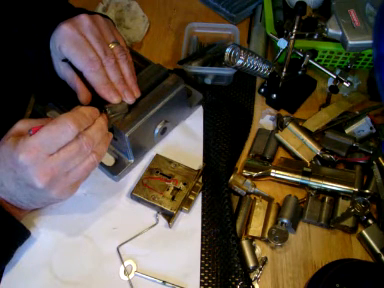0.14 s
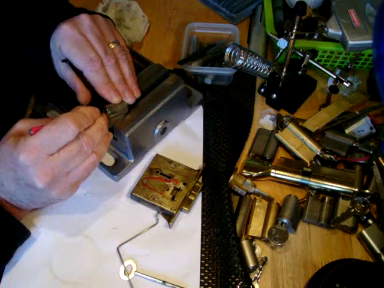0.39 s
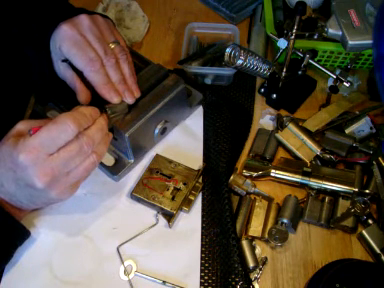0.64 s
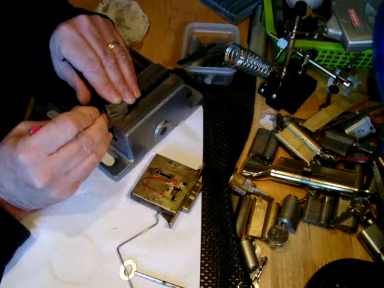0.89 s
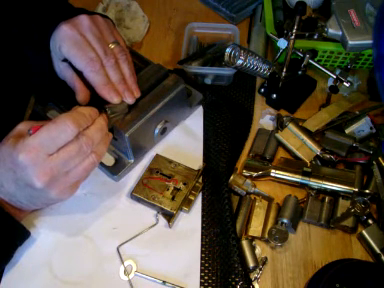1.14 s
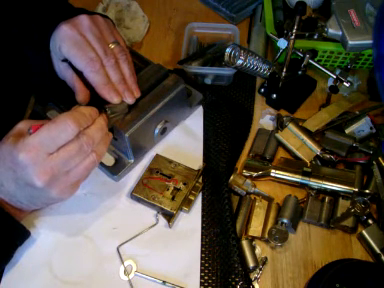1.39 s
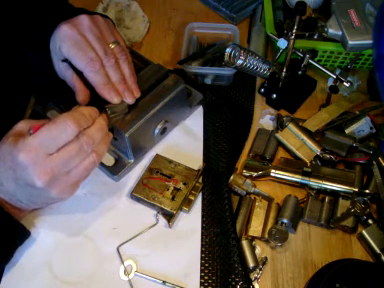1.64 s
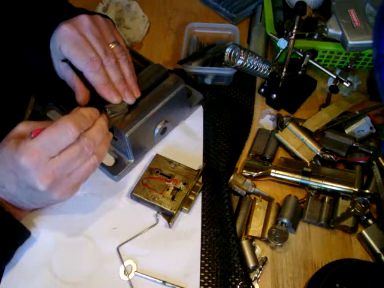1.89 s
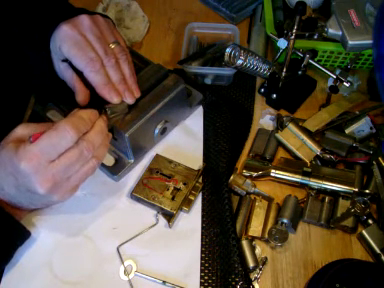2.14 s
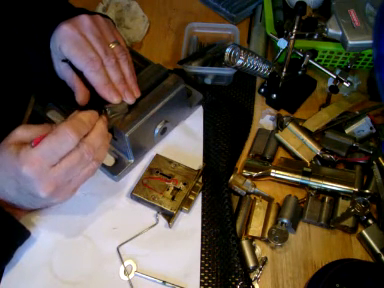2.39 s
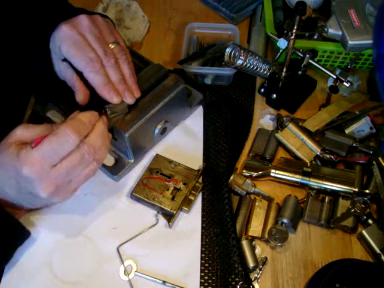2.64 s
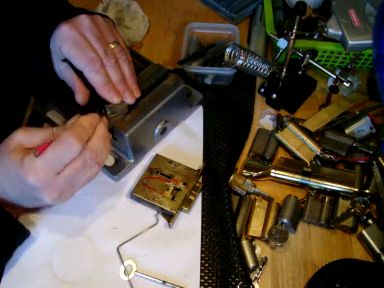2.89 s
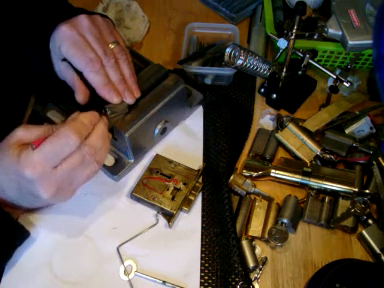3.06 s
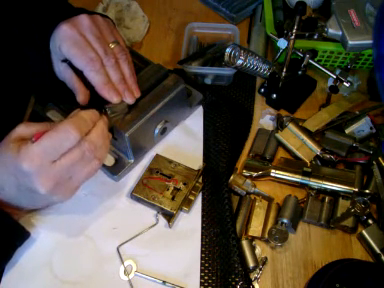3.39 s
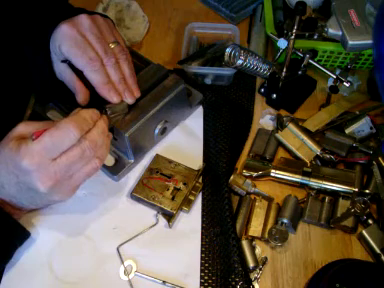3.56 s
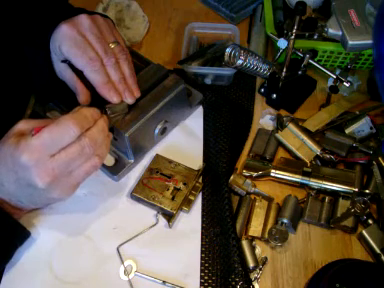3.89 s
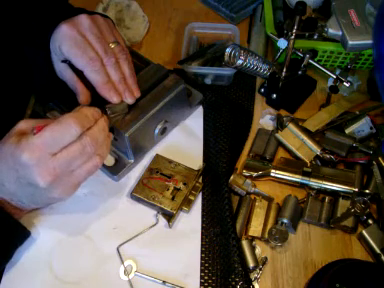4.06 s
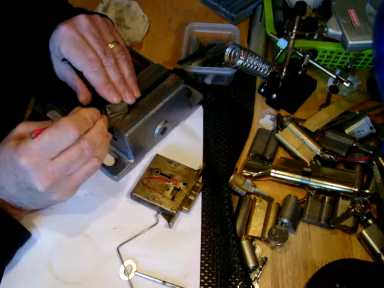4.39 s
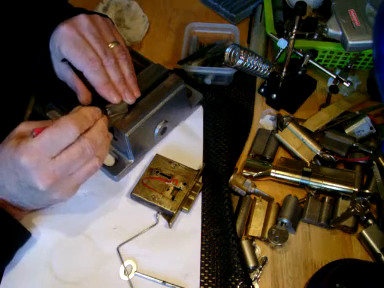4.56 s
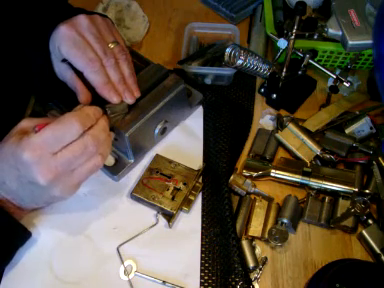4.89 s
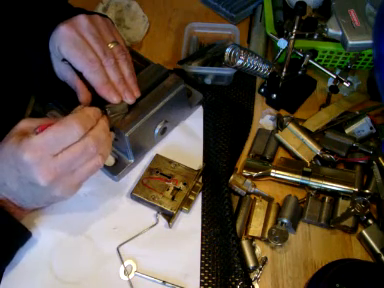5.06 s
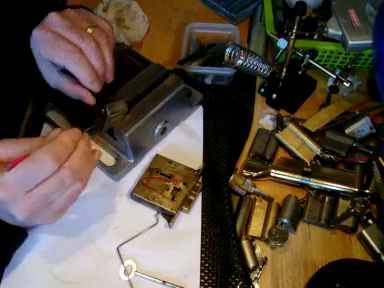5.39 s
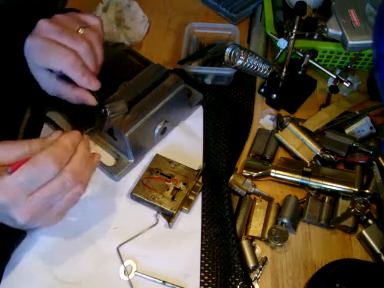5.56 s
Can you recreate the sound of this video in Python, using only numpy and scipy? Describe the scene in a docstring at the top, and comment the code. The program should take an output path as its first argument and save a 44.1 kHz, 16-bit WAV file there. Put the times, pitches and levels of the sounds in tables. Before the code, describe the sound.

Close on a workbench in a small room, a lock held in a vice is picked. Isolated small ringing metal clicks come at uneven gaps, a stronger one after two seconds and a cluster near four, with dull hand bumps on the bench. A brief scrape leads to two bright steel clacks at the end. A cheap microphone adds constant hiss, low hum and a thin, stuttering high whine.

```python
"""A lock clamped in a vice is picked: pins snap back against the pick with small ringing clicks.
Each contact is a rattling force that sets off fading tones in bench, vice, lock body, pick and pins.
Near the end the lock gives with two bright steel clacks; hand bumps are dull thuds of the bench top.
A cheap desk camera in the small room adds hiss (shaped noise), mains and fan hum (wavering sines)
and a thin electronic whine (one sine) that stutters at its frame rate."""
import sys
import numpy as np
from scipy import signal
from scipy.fft import rfft, irfft
from scipy.io import wavfile

SR = 44100
rng = np.random.default_rng(int(sys.argv[2]) if len(sys.argv) > 2 else 0)


def generate_wav(sig):
    """Save sig (samples, or channels by samples) to the path in sys.argv[1] as 16-bit PCM at SR."""
    pcm = np.round(np.clip(np.atleast_2d(sig).T, -1, 1) * 32767).astype(np.int16)
    wavfile.write(sys.argv[1], SR, pcm)


N = 252693  # samples, about 5.7 s
TIME = np.arange(N) / SR  # s
SHORT = TIME[:2 ** 13 + 2 ** 12]  # time within one hit or echo, s

# tones of the bench top: [f/Hz, relative level/dB, time to fade by 60 dB/s]
BENCH = [(88, -4.5, 0.062), (128, 1.5, 0.03), (183, -7.5, 0.075), (275, -6, 0.044), (382, -1, 0.086)]
# tones of the lock body: [f/Hz, relative level/dB, time to fade by 60 dB/s]
LOCK = [(1007, 0, 0.24), (1020, -3, 0.032), (1123, -3, .1), (1150, 4, 0.21), (1365, -2.5, .14),
        (1435, -5, 0.27)]


def from_db(db):
    """Turn decibels into an amplitude factor."""
    return 10 ** (np.asarray(db) / 20)


def rms_one(x):
    """Scale a signal so that its rms is 1."""
    return x / np.sqrt(np.mean(x ** 2) + 1e-20)


def add(track, s, sound):
    """Mix a sound in at time s, cutting it off at the end of the track."""
    at = int(round(s * SR))
    track[at:at + len(sound)] += sound[:N - at]


def noise(gain):
    """Make noise of rms 1: random samples with each frequency bin scaled by its gain."""
    white = rng.standard_normal(2 * len(gain) - 2)
    return rms_one(irfft(rfft(white) * gain)[:N])


def background():
    """Steady rumble and hiss with a few faint resonances, over hum whose phase slowly wanders."""
    # room rumble and amplifier hiss: [f/Hz, relative level per Hz/dB]
    floor = [(20, 18), (40, 14.5), (110, 15.5), (300, 11.5), (700, 8), (1100, 5), (1800, 2), (3500, 0),
             (5000, -1), (8500, -1), (10000, -4.5), (11300, -9), (12500, -20), (13600, -25)]
    floor_db = -47.5  # sets the overall level of the rumble and hiss
    # faint ringing in the hiss: [centre f/Hz, half-width/Hz, rms level/dB]
    hiss_peaks = [(3087, 105, -65), (3850, 110, -68), (6630, 81, -67)]
    # mains and fan hum: [f/Hz, rms level/dB]
    hum = [(49.2, -67), (49.9, -57.5), (99.8, -64), (149.8, -57), (249.7, -62), (296, -61.5),
           (345.5, -58.5), (440, -62.5), (493, -66), (538, -71.5), (790, -66)]

    hz = np.maximum(np.fft.rfftfreq(2 ** 18, 1 / SR), 1)
    points, levels = np.transpose(floor)
    floor_shape = from_db(np.interp(np.log(hz), np.log(points), levels))
    power = (from_db(floor_db) * rms_one(floor_shape)) ** 2
    for centre, width, db in hiss_peaks:
        peak = 1 / (1 + ((hz - centre) / width) ** 2)
        power += (from_db(db) * rms_one(peak)) ** 2
    out = np.sqrt(power.mean()) * noise(np.sqrt(power))

    knots = TIME[::2 ** 11]
    for pitch, db in hum:
        drift = 0.039 * np.cumsum(rng.standard_normal(len(knots)))  # random walk of the phase, rad
        wander = np.interp(TIME, knots, drift) + rng.uniform(0, 2 * np.pi)
        out += from_db(db) * np.sqrt(2) * np.sin(2 * np.pi * pitch * TIME + wander)
    return out


def whine():
    """A sine whose pitch sags very briefly at most frames, so that it loses part of a cycle."""
    # the stutter goes round and round in seven steps: [cycles lost at each frame]
    slip_round = [.2, .4, .6, .8, 0, .2, .6]
    whine_hz, whine_db, sag_hz = 7703.9, -46.5, 553  # pitch, rms level, drop in pitch
    first_frame_s, frame_s = .0195, .034597
    round_start_s, slip_step_s = .07, .258

    frames = np.arange(first_frame_s, N / SR, frame_s)
    steps = np.floor((frames - round_start_s) / slip_step_s).astype(int)
    sag = np.zeros(N)
    for s, cycles in zip(frames, np.take(slip_round, steps, mode="wrap")):
        length = cycles / sag_hz
        add(sag, s - length / 2, np.full(int(round(length * SR)), float(sag_hz)))
    phase = 2 * np.pi * np.cumsum(whine_hz - sag) / SR
    return from_db(whine_db) * np.sqrt(2) * np.sin(phase)


def chatter(length):
    """The force of a contact: a first knock, then a dying rattle of tiny rebounds."""
    rebounds = rng.standard_normal(len(SHORT)) * (rng.random(len(SHORT)) < .1)
    force = rebounds * np.exp(-SHORT / length)
    force /= np.sqrt(np.sum(force ** 2)) + 1e-9
    force[0] += 1
    return force


def surroundings(early_db, early_s):
    """Direct sound, quick echoes off the cluttered bench, then the tail of the room."""
    room_t60_s, room_db = 0.31, -2  # time to fade by 60 dB; tail energy against the direct sound
    early, late = rng.standard_normal((2, len(SHORT)))
    early = early * (SHORT > .002) * np.exp(-SHORT / early_s)
    late = late * (1 - np.exp(-SHORT / 0.022)) * from_db(-60 * SHORT / room_t60_s)
    echoes = from_db(early_db) * rms_one(early) + from_db(room_db) * rms_one(late)
    response = echoes / np.sqrt(len(SHORT))
    response[0] += 1
    return response


def unit_attack(x):
    """Scale each hit so that its first 15 ms have rms 1."""
    attack = x[..., :int(.015 * SR)]
    return x / np.sqrt(np.mean(attack ** 2, axis=-1, keepdims=True) + 1e-20)


def strike(modes, forces, rooms, scatter_db, crack_db, crack_s, tilt_db=0):
    """One hit per force: each mode (tone) rings cleanly and gives a short crack smeared by echoes."""
    hz, db, t60 = np.transpose(modes)
    db = db + np.outer(tilt_db, np.log2(hz / hz[0]))  # tilt in dB per octave above the first mode
    swing = np.sin(2 * np.pi * np.outer(hz, SHORT))
    rings = rfft(swing * np.exp(-np.log(1000) * SHORT / t60[:, None]))
    cracks = rfft(swing * SHORT * np.exp(-SHORT / crack_s))
    force = rfft(forces)
    echoed_force = force * rfft(rooms)

    out = 0
    for shapes, drive, gain_db in (rings, force, db), (cracks, echoed_force, db + crack_db):
        # what each mode takes from each force; dividing by it lets the gains set the levels
        taken_up = np.sqrt(np.abs(drive) ** 2 @ np.abs(shapes.T) ** 2)
        scattered_db = gain_db + scatter_db * rng.standard_normal(taken_up.shape)
        strength = from_db(scattered_db) / taken_up
        signs = rng.choice([-1, 1], taken_up.shape)
        out = out + drive * ((strength * signs) @ shapes)
    # a part radiates little outside the range of its modes
    radiated = signal.butter(2, [.7 * hz[0], 1.2 * hz[-1]], "band", fs=SR, output="sos")
    return unit_attack(signal.sosfilt(radiated, irfft(out)))


def share(modes, hardness):
    """Extra level in dB: hard contacts favour parts that ring above the lock body, soft ones below."""
    part, body = (np.log2(np.array(table)[:, 0]).mean() for table in (modes, LOCK))
    return hardness * (part - body)


def picking():
    """Every click and drag catch shakes the bench, the vice, the lock body, the pick and the pins."""
    # pins snap back and the plug gives:
    # [t/s, level/dB, hardness/dB per octave, extra ring of the pick/dB, chatter decay time/s]
    clicks = [(0.283, -51, -1.5, 6, 0.0052), (1.151, -39, -3, 1.5, 0.0022), (1.4515, -54, -4, 0, 0.0053),
              (2.2599, -33.5, 1, -1, 0.0025), (3.7383, -42.5, -2.5, -9, 0.0014),
              (3.97, -44.5, -4.5, 1, 0.0084), (3.989, -35, -1, 5, 0.0019), (4.041, -50.5, -1, 12, .003),
              (4.229, -42, -2, 2.5, 0.0059), (4.861, -44.5, -1, -6, 0.0028), (5.2476, -44, 2, -10, .003),
              (5.4893, -31.5, 3, 9.5, 0.0024), (5.4924, -38.5, 8, 1.5, 0.0016), (5.4983, -37, 2.5, 9, .003),
              (5.5265, -48.5, -1.5, 23, 0.0034), (5.557, -31.5, 3.5, -3.5, 0.0061)]
    # tones of the vice: [f/Hz, relative level/dB, time to fade by 60 dB/s]
    vice = [(426, -10, .06), (488, -9, 0.038), (585, -4, 0.41), (615.5, -3.5, 0.15), (704, -0.5, 0.18),
            (809, 0, 0.099)]
    # tones of the steel pick: [f/Hz, relative level/dB, time to fade by 60 dB/s]
    pick = [(2008, -8, 0.15), (2375, -1, 0.087), (2300, 0.5, 0.096), (2520, -2.5, 0.13), (2680, -5, 0.03),
            (2887, -2.5, 0.15), (3190, -5, 0.035), (3340, -1, 0.16), (3570, -13, .06), (3950, -11, .06),
            (4106, -3, 0.1), (4340, -7, 0.066)]
    # tones of the pins: [f/Hz, relative level/dB, time to fade by 60 dB/s]
    pins = [(4690, -5.5, 0.069), (5420, -0.5, 0.037), (5400, 7.5, 0.096), (5540, -6, .04), (5850, -1, 0.13),
            (6220, 4.5, 0.055), (6320, 1, 0.054), (6820, 2, 0.027), (6930, -9, .05), (7856, -1.5, 0.025),
            (8390, -18, .04), (9300, -11, .03), (10560, -20, 0.0092), (11800, -25, .008)]
    # level of each part at hardness 0 and no extra ring, against the lock body
    bench_db, vice_db, pick_db, pins_db = -18, -2.5, -7.5, -9

    times, db, hardness, pick_ring_db, lengths = np.transpose(clicks + catches())
    # dB per octave: hardness brightens the pick, but a flicked pick rings mostly in its lowest modes
    pick_tilt = 2 + 1.0 * hardness - 0.68 * pick_ring_db
    forces = np.array([chatter(length) for length in lengths])
    rooms = np.array([surroundings(early_db=4.0, early_s=0.015) for s in times])

    bench_hits = strike(BENCH, forces, rooms, scatter_db=4.0, crack_db=5.0, crack_s=0.0019, tilt_db=9.0)
    vice_hits = strike(vice, forces, rooms, scatter_db=2.0, crack_db=-2.0, crack_s=0.0011)
    lock_hits = strike(LOCK, forces, rooms, scatter_db=-1.5, crack_db=-0.5, crack_s=0.0012)
    pick_hits = strike(pick, forces, rooms, scatter_db=2.5, crack_db=3.0, crack_s=0.00051,
                       tilt_db=pick_tilt)
    pin_hits = strike(pins, forces, rooms, scatter_db=1.5, crack_db=0.0, crack_s=0.00036)
    parts = [(bench_db, bench_hits),
             (vice_db + share(vice, hardness), vice_hits),
             (0, lock_hits),
             (pick_db + share(pick, hardness) + pick_ring_db, pick_hits),
             (pins_db + share(pins, hardness), pin_hits)]
    hits = sum(from_db(db + part_db)[:, None] * sound for part_db, sound in parts)

    out = np.zeros(N)
    for s, hit in zip(times, hits):
        add(out, s, hit)
    return out


def bumps():
    """The hand bumps the vice: soft pushes reach the bench top as dull thuds."""
    # pushes of the hand: [t/s, peak level/dB, chatter decay time/s]
    pushes = [(1.451, -36, .0074), (3.983, -36, .012), (4.392, -39, .02), (4.42, -33.5, 0.024),
              (4.482, -37.5, 0.0061), (5.17, -33, 0.016)]
    forces = np.array([chatter(length) for s, db, length in pushes])
    rooms = np.array([surroundings(early_db=-9.5, early_s=0.013) for row in pushes])
    thuds = strike(BENCH, forces, rooms, scatter_db=0.0, crack_db=-3.5, crack_s=0.0051)
    out = np.zeros(N)
    for (s, db, length), thud in zip(pushes, thuds):
        add(out, s, from_db(db) * thud / np.abs(thud).max())
    return out


def catches():
    """A dragged pick catches on the pins at uneven intervals; each catch is a small click."""
    # the pick drags over the pins: [t/s, length/s, level/dB, hardness/dB per octave]
    drags = [(3.932, .03, -52.5, -3), (5.1545, .074, -47, 0.5)]
    catches_per_s, chatter_s, pick_ring_db = 60, 0.0051, 2
    rows = []
    for start, length, db, hardness in drags:
        for s in np.arange(start, start + length, 1 / catches_per_s):
            late = rng.uniform(0, 0.36)  # delay as a part of the interval
            uneven = rng.standard_normal()  # dB
            rows.append((s + late / catches_per_s, db + uneven, hardness, pick_ring_db, chatter_s))
    return rows


def scene():
    """The lock and the bench over the steady background."""
    return (picking() + bumps() + background() + whine())[None]


def record(dry):
    """A steep low-pass filter cuts the top, and the converter sits at a constant offset."""
    cutoff_hz, offset = 14400, -.0951  # start of the 60 dB cut; shift of the whole wave
    low_pass = signal.cheby2(12, 60, cutoff_hz, fs=SR, output="sos")
    return signal.sosfilt(low_pass, dry) + offset


dry = scene()
out = record(dry)
generate_wav(out)
```